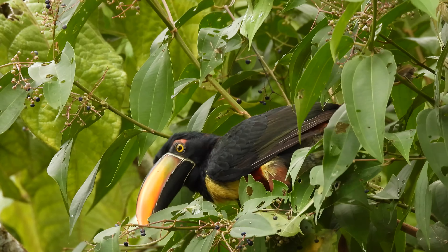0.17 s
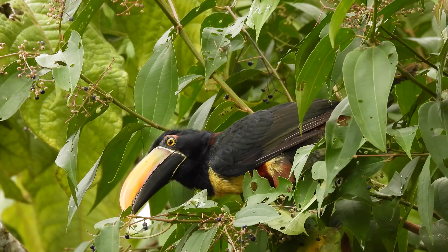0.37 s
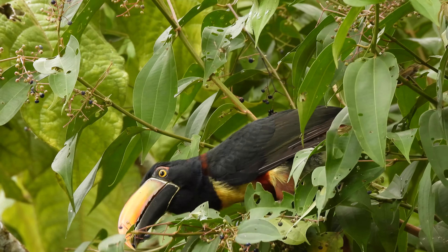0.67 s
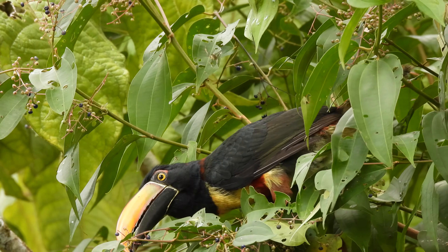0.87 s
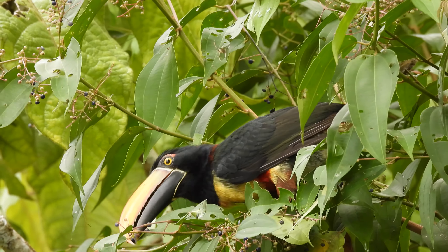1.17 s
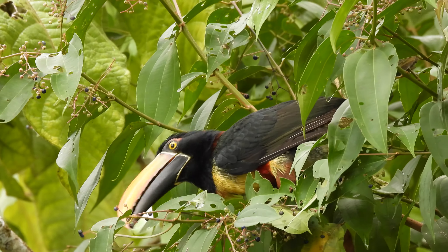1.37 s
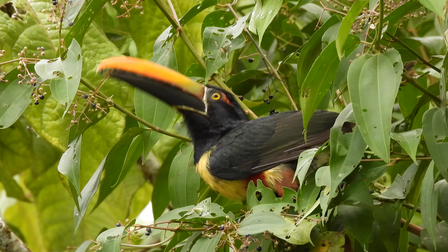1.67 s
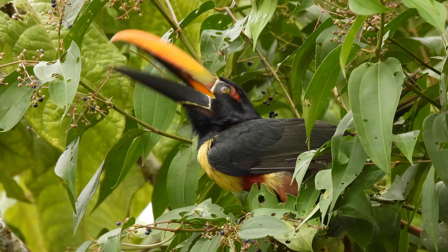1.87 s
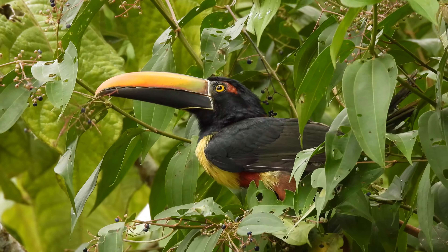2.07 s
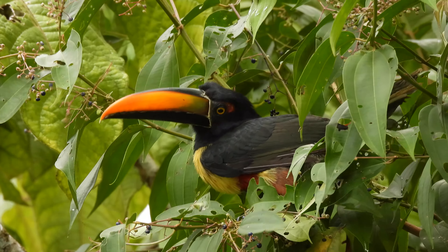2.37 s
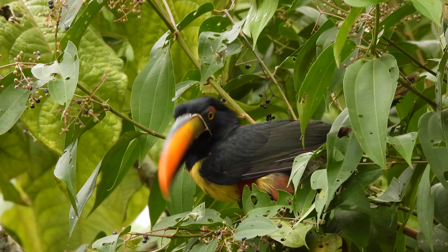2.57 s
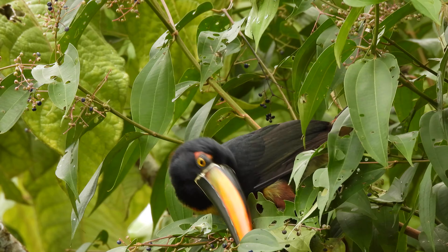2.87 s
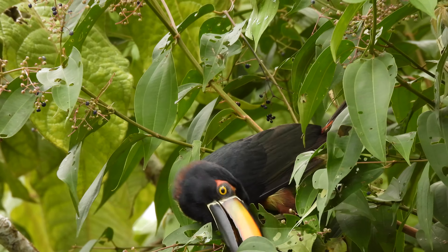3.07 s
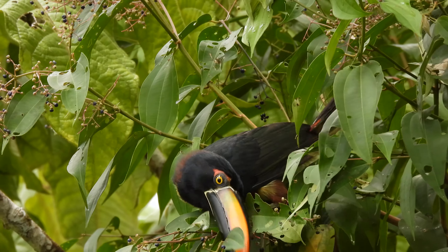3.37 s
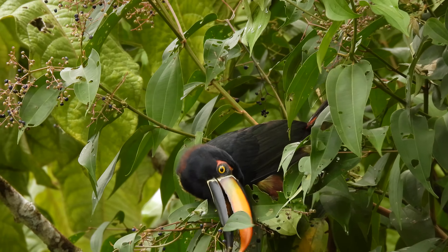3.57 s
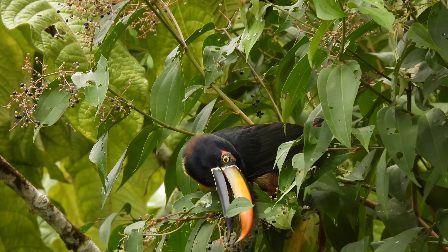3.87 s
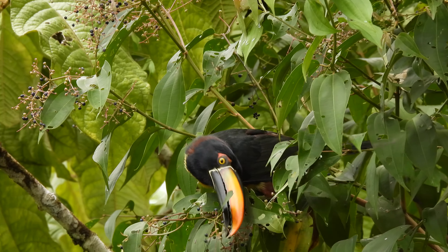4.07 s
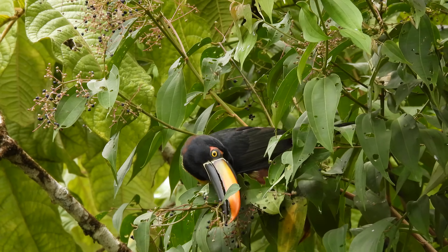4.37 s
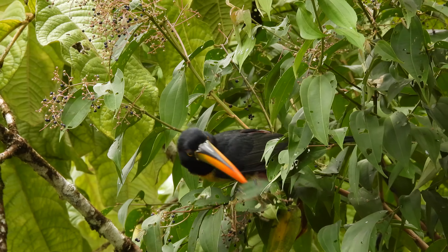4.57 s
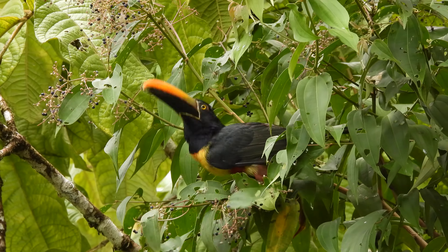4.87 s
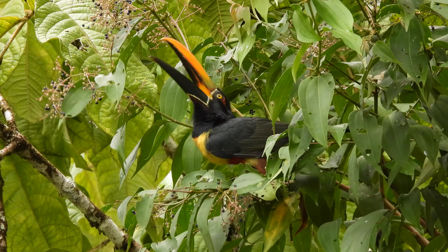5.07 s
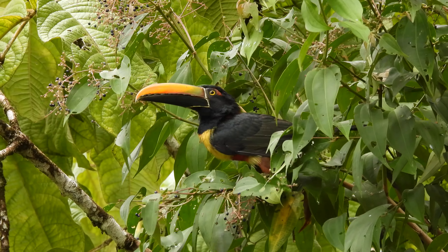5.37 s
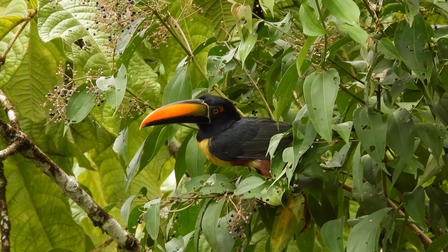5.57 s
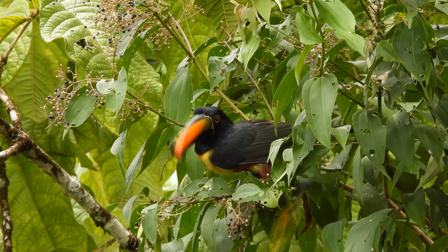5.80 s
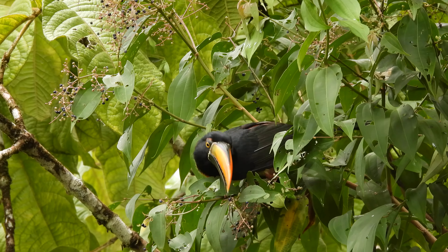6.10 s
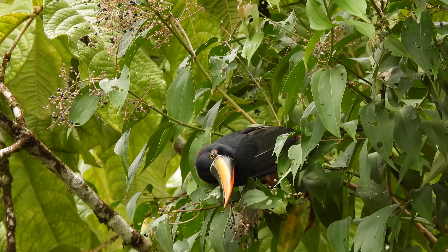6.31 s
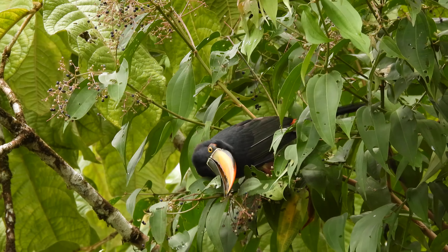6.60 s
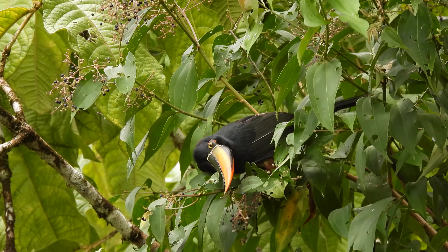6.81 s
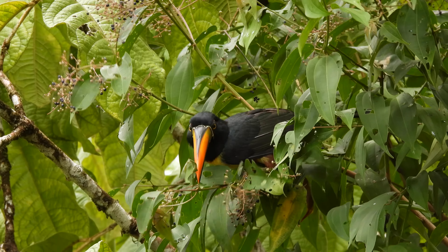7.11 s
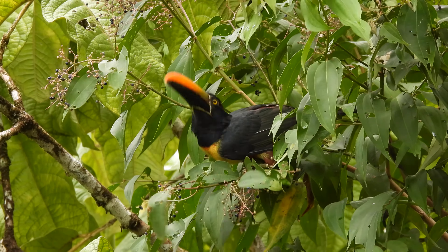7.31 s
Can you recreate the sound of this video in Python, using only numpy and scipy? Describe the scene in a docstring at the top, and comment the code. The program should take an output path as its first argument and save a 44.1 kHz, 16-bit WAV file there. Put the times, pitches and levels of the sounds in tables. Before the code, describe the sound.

Tropical forest insects sizzle steadily; one close cicada's rasping buzz fades, a small zoom motor whirs between clicks, and three rising chirps come near the end.

```python
"""Cicadas and crickets of a tropical forest

Insects sing all round a camera. A near cicada, two click trains shaped by a resonance curve, buzzes and winds
down over a noise chorus, a throbbing group and a narrow band that rises slightly in pitch until 3 s, then sinks.
Resonated noise strokes make whistles, crickets and a high katydid; three gliding tones chirp. Tapped resonances
make a zoom motor whir between clicks of its lever, while fingers knock, brush and creak on the body over rustle,
hiss and faint hum."""
import sys
import numpy as np
from scipy import signal
from scipy.fft import rfft, irfft, next_fast_len
from scipy.io import wavfile
from scipy.ndimage import uniform_filter1d

SR = 44100
rng = np.random.default_rng(int(sys.argv[2]) if len(sys.argv) > 2 else 0)


def digitize_waveform(pressure):
    """Quantize a signal to 16-bit integers and store it at the path in sys.argv[1].

    Rows of a 2-D input are taken as channels; values are limited to [-1, 1].
    """
    field = np.atleast_2d(pressure).T
    bounded = np.clip(field, -1, 1)
    quanta = np.round(bounded * 32767).astype(np.int16)
    wavfile.write(sys.argv[1], SR, quanta)


N = 328545

# Loudness of the near cicada: time_s, level_db
CICADA_LEVEL = [(0, -44), (.3, -41.5), (.55, -41), (1.3, -38), (1.8, -41), (2.3, -42.5), (2.8, -48),
                (3.8, -56.5), (5.5, -79), (7.45, -73)]
# Buckling pace of its tymbals: time_s, pace_hz, second_tymbal_lateness_cycles
CICADA_PACE = [(.9, 159.5, .0235), (1.0, 153, .0235), (1.1, 148.8, .0235), (1.25, 146.8, .0235),
               (1.4, 146, .0235), (1.7, 145.05, .0235), (2.03, 144.4, .023), (2.15, 143.4, .0135),
               (2.55, 142.95, .0135), (3.05, 140.9, .021), (3.6, 140.9, .021), (7.45, 135, .021)]
# Spectrum of its tymbal clicks: frequency_hz, relative_db
TYMBAL_SPECTRUM = [(3000, -24), (3250, -16.5), (3450, -8.5), (3630, -12.5), (3780, -1), (3950, -11),
                   (4250, -1), (5000, -2.5), (5480, -8.5), (6100, -1), (6450, -3), (7000, -2.5),
                   (7250, -8.5), (7600, -31)]
# Spectrum of the far chorus: frequency_hz, relative_db
CHORUS_SPECTRUM = [(2600, -30), (3100, -23), (3750, -13.5), (3930, -17.5), (4250, -4.5), (4480, -9.5),
                   (4770, -7), (5000, -5), (5240, -8.5), (5450, -5.5), (6000, -2), (6800, -7.5),
                   (7450, -21), (8300, -16), (8650, -11), (9000, -78), (9600, -24.5)]
# Loudness of the far chorus: time_s, level_db
CHORUS_LEVEL = [(0, -42.5), (.8, -45.5), (1.5, -42.5), (2.3, -41.5), (3, -41.5), (4.5, -44), (6, -44.5),
                (7.45, -45)]
# Loudness of the throbbing group at the top of a swell: time_s, level_db
THROB_LEVEL = [(0.2, -57), (.56, -40), (1.3, -43), (2.2, -47), (2.9, -43.5), (4.2, -40), (5.5, -45),
               (7.45, -52)]
# Spectrum of the throbbing group: frequency_hz, relative_db
THROB_SPECTRUM = [(5400, -23), (5600, -5), (5750, -1.5), (5870, 2), (6000, -12), (6350, -7.5), (6650, -14),
                  (7100, -27)]
# Narrow band of insects that rises slightly in pitch until 3 s, then sinks: time_s, centre_hz, level_db
DRIFTING_BAND = [(0, 4900, -60), (2, 5020, -56), (3, 5090, -54.5), (3.8, 5050, -52.5), (4.5, 4900, -53),
                 (5.3, 4770, -54), (6.2, 4730, -53), (7.45, 4650, -53)]
# Thin steady whistles in the chorus: start_s, length_s, wing_hz, level_db, stroke_rate_hz
WHISTLE_SONGS = [(.3, .7, 4786, -60, 5), (.4, 0.8, 5944, -48, 5), (0.65, 1.2, 7060, -68, 4.4),
                 (2.95, 1, 5060, -56, 5.7), (3, 1, 6347, -53, 5), (3.3, 2.6, 4780, -58, 4.3),
                 (4, 1.3, 4958, -63, 5), (3.8, 3.6, 5910, -54, 5)]
# Crickets that repeat one song: first_s, every_s, length_s, wing_hz, level_db, stroke_rate_hz
CRICKET_SINGERS = [(0, 9, 7.5, 8570, -65, 52), (2.48, 1.64, .75, 8520, -59, 44),
                   (-.1, 1.78, 1.0, 8320, -62.5, 34), (.25, 6.77, .92, 7900, -63, 60)]
# The katydid, likewise: first_s, every_s, length_s, wing_hz, level_db, stroke_rate_hz
KATYDID_SINGERS = [(.09, .396, .14, 12350, -78, 150)]
# Rising chirps: start_s, lowest_hz, peak_level_db
RISING_CHIRPS = [(6.845, 4710, -43.5), (7.065, 4200, -43), (7.38, 4160, -43)]
# Resonances of the lens barrel: centre_hz, width_hz, relative_db
BARREL_RESONANCES = [(1200, 500, -7), (2420, 520, 0), (8810, 120, -12), (9900, 1500, -13),
                     (13500, 4000, -21)]
# Contacts with the camera: start_s, peak_db, centre_hz, rattle_s, tick_relative_db
CONTACTS = [(3.08, -43, 1300, 0.005, -30), (3.081, -48.5, 630, 0.031, -30), (3.093, -40, 2450, 0.001, -25),
            (3.0995, -32.5, 2440, 0.00082, -13), (3.104, -48, 900, 0.003, -30),
            (3.133, -45, 2200, 0.003, -30), (3.1545, -35.5, 466, 0.001, -45),
            (3.155, -44, 1700, 0.002, -30), (3.161, -45, 297, 0.0017, -40), (4.334, -40, 1010, 0.004, -30),
            (4.3885, -34, 1150, 0.0023, 4.5), (4.3894, -33.5, 3030, 0.001, -5),
            (4.391, -37, 2100, 0.002, -25), (4.393, -43, 694, 0.0071, -35), (4.397, -37, 3180, 0.0033, -25),
            (4.4005, -34.5, 1150, 0.00073, -25), (4.402, -32.5, 1660, 0.002, -25),
            (4.596, -43, 2180, 0.0066, -40), (4.709, -46, 340, 0.0013, -32), (4.709, -41, 1230, 0.002, -25),
            (4.7105, -44, 2700, 0.0015, -19), (4.715, -38.5, 790, 0.0015, -32),
            (4.722, -38, 760, 0.0032, -35), (4.733, -47, 620, 0.0062, -35), (4.723, -48, 1850, 0.0024, -30),
            (4.794, -50, 950, 0.0036, -30), (5.21, -51, 980, 0.006, -30), (5.71, -51, 700, 0.007, -30),
            (5.944, -51, 1980, 0.002, -25), (5.945, -53, 2980, 0.002, -25),
            (6.762, -38.5, 1100, 0.0041, -35), (6.763, -48, 1600, 0.0027, -37),
            (6.875, -48, 920, 0.0073, -30), (6.957, -49.5, 880, 0.016, -30), (7.19, -49, 670, 0.0032, -30),
            (7.261, -52, 935, 0.0052, -30)]
# Modes of the camera body: frequency_hz, relative_db, t60_s
BODY_MODES = [(200, -2, .035), (260, -3, .03), (380, -2, .028), (500, 1, .028), (620, 0, .03),
              (780, 1, .025), (1100, 0, .022), (1300, 0, .018), (1600, 0, .014), (1850, -1, .012),
              (2380, 1, .016), (2650, -1, .014), (2950, 1, .016), (3200, 1, .025)]
# Cloth or skin brushing the body: start_s, length_s, centre_hz, width_hz, level_db
BRUSH_STROKES = [(0.0, 0.32, 1000, 1910, -58.5), (0.821, 0.15, 497, 500, -61),
                 (6.581, 0.02, 600, 900, -53.5), (6.712, 0.12, 1170, 940, -55.5),
                 (6.742, 0.061, 1480, 700, -51.5), (6.761, 0.039, 633, 150, -50)]
# Low creaks of the grip: start_s, length_s, pitch_hz, level_db
GRIP_CREAKS = [(6.21, 0.029, 381, -63), (6.34, 0.032, 402, -61.5), (6.385, 0.037, 400, -62),
               (6.432, 0.074, 393, -60), (6.635, 0.045, 568, -66), (7.387, .1, 565, -64.5)]
# Spectrum of distant leaves and water: frequency_hz, relative_db
RUSTLE_SPECTRUM = [(53, -73), (90, -25.5), (154, -18.5), (177, -6.5), (282, -5), (319, -2.5), (408, -6),
                   (690, -1.5), (857, -3.5), (969, -4), (1060, -4), (1600, -6.5), (2340, -8), (2900, -9.5),
                   (3600, -8.5), (4680, -40)]
# Loudness of the rustle: time_s, level_db
RUSTLE_LEVEL = [(0, -59), (1, -58.5), (2.5, -59), (4, -58.5), (5.5, -60), (7.45, -58)]
# Spectrum of the thin treble: frequency_hz, relative_db
HISS_SPECTRUM = [(7200, -9), (8600, -10), (9050, -9), (10200, -17), (11200, -23), (12300, -21),
                 (13200, -39), (14300, -19.5), (15900, -17)]
# Loudness of the thin treble: time_s, level_db
HISS_LEVEL = [(0, -70), (1.5, -65.5), (4.3, -66), (5, -73), (7.45, -71.5)]
# Faint hum: time_s, pitch_hz, level_db
HUM_TONE = [(0, 186, -86), (3.3, 188.8, -76.5), (4.5, 188.9, -78.5), (7.45, 188.4, -100)]

BODY_LAG_S = 2.5e-5  # the lens side of the body is nearer the right port


def undb(db):
    """Definition of the decibel: amplitude ratio from level."""
    return 10 ** (np.asarray(db) / 20)


def unit(x):
    """Equal mean power: scales to rms 1."""
    return x / np.sqrt(np.mean(x ** 2))


def curves(table):
    """Linear interpolation: columns of a table joined by straight lines in time."""
    s, *columns = np.transpose(table)
    return [np.interp(np.arange(N) / SR, s, column) for column in columns]


def colour(x, table):
    """Spectral filtering: shapes x by frequency and level points, then sets rms 1."""
    hz, db = np.transpose(table)
    size = next_fast_len(N, True)
    f = np.fft.rfftfreq(size, 1 / SR) + 1e-3  # keeps the logarithm finite
    gain = undb(np.interp(np.log(f), np.log(hz), db, -120, -120))
    return unit(irfft(rfft(x, size) * gain, size)[..., :N])


def ring(x, hz, width_hz):
    """Second-order resonance with gain 1 at the centre."""
    return signal.lfilter(*signal.iirpeak(hz, hz / width_hz, SR), x)


def walk(rate, size=N):
    """Smoothed random modulation: levels held 1 / rate s and averaged twice; spread 1."""
    k = int(SR / rate)
    held = np.repeat(rng.standard_normal(size // k + 3), k)
    return unit(uniform_filter1d(uniform_filter1d(held, k), k))[:size]


def gate(start, end, edge):
    """Amplitude window: 1 from start to end with soft edges."""
    t = np.arange(N) / SR
    return np.clip(np.minimum(t - start, end - t) / edge + .5, 0, 1)


def diffuse(count):
    """Diffuse-field coherence: ports hear alike bass, unlike sound once their gap nears half a wave."""
    gap_m, likeness, sound_speed = .028, .61, 343  # speed in m/s
    size = next_fast_len(count, True)
    like = likeness * np.sinc(2 * np.fft.rfftfreq(size, 1 / SR) * gap_m / sound_speed)
    mid, side = rfft(rng.standard_normal((2, size))) * np.sqrt([1 + like, 1 - like])
    return irfft(np.array([mid + side, mid - side]), size)[:, :count] / np.sqrt(2)


def ports(x, lag_s, pan_db=0.):
    """Arrival-time difference: a sound from one side reaches the left port lag_s later."""
    size = next_fast_len(N, True)
    turn = np.exp(-2j * np.pi * np.fft.rfftfreq(size, 1 / SR) * lag_s)
    left = irfft(rfft(x, size) * turn, size)[:N]
    return np.array([left * undb(pan_db / 2), x * undb(-pan_db / 2)])


def forest(x, t60, wet_db, lag_s, pan_db):
    """Reverberant scattering: direct sound plus decaying echoes of trunks and leaves; power is kept."""
    t = np.arange(int(SR / 2)) / SR
    tail = diffuse(len(t)) * 1000. ** (-t / t60)
    tail = tail / np.sqrt(np.sum(tail ** 2) / 2)
    wet = signal.fftconvolve(x[None], tail, axes=1)[:, :N]
    return (ports(x, lag_s, pan_db) + undb(wet_db) * wet) / np.sqrt(1 + undb(2 * wet_db))


def pace():
    """Entrainment: the tymbals race until they lock, settle, then slowly loosen in timing."""
    lock_s, settle_s = .9, .04
    tight, loose, loosen_per_s2 = .0004, .015, .0004  # parts of the timing scatter, in cycles
    since = np.clip(np.arange(N) / SR - lock_s, 0, None)
    scatter = tight + loose * np.exp(-since / settle_s) + loosen_per_s2 * since ** 2
    hz, late = curves(CICADA_PACE)
    return hz, late, scatter


def cicada():
    """Periodic impulses: two tymbals buckle in turn; steady timing gives a line comb, loose timing a rasp."""
    weak_side_db, click_scatter_db = -6, .8
    hz, late, scatter = pace()
    half_cycles = np.cumsum(2 * hz / SR)
    count = np.arange(1, int(half_cycles[-1]))
    second = count % 2  # 1 for the second, softer tymbal
    at = np.interp(count, half_cycles, np.arange(N))
    chance = rng.standard_normal((len(count), 2))
    now = at.astype(int)
    at = at + (scatter[now] * chance[:, 0] + late[now] * second) * SR / hz[now]
    size = undb(weak_side_db * second + click_scatter_db * chance[:, 1])
    # windowed sinc places each click between samples
    taps = np.arange(-8, 9)
    spots = np.round(at)[:, None] + taps
    clicks = size[:, None] * np.sinc(spots - at[:, None]) * np.hanning(len(taps) + 2)[1:-1]
    pulses = np.bincount(np.clip(spots, 0, N - 1).astype(int).ravel(), clicks.ravel(), N)
    song = colour(pulses, TYMBAL_SPECTRUM) * undb(curves(CICADA_LEVEL)[0])
    return forest(song, t60=.9, wet_db=2.5, lag_s=8e-5, pan_db=-1.3)


def chorus():
    """Incoherent superposition: countless far cicadas merge into a noise band combed by fixed echoes."""
    echo_share = 1.1
    echoed = forest(rng.standard_normal(N), t60=.35, wet_db=2.9, lag_s=8e-5, pan_db=-.32)
    return colour(diffuse(N) + echo_share * echoed, CHORUS_SPECTRUM) * undb(curves(CHORUS_LEVEL)[0])


def throbbing_group():
    """Amplitude modulation: a nearer group's noise band swells three times a second."""
    peak_s, every_s, sharpness = .56, .333, 1.7
    t = np.arange(N) / SR
    swell = np.abs(np.cos(np.pi * (t - peak_s) / every_s)) ** sharpness
    song = colour(rng.standard_normal(N), THROB_SPECTRUM) * undb(curves(THROB_LEVEL)[0]) * swell
    return forest(song, t60=.22, wet_db=-4., lag_s=9e-5, pan_db=-.27)


def drifting_group():
    """Quadrature modulation: slow noise on a drifting carrier is a narrow band of many alike wings."""
    width_hz = 250
    hz, db = curves(DRIFTING_BAND)
    lowpass = signal.butter(2, width_hz / 2, fs=SR, output="sos")
    slow = signal.sosfilt(lowpass, rng.standard_normal((2, 2, N)))
    phase = 2 * np.pi * np.cumsum(hz) / SR
    return undb(db) * unit(slow[0] * np.cos(phase) + slow[1] * np.sin(phase))


def wings(song_rows, width_hz, depth, edge):
    """Stridulation: a file drawn over a scraper, stroke after uneven stroke, rings the narrow wing."""
    out = np.zeros(N)
    for start, length, hz, db, rate in song_rows:
        end = start + length
        span = slice(max(int((start - edge) * SR), 0), min(int((end + edge) * SR), N))
        size = span.stop - span.start
        uneven_rate = rate * (1 + .25 * walk(4.6, size))
        stroke = np.sin(np.pi * np.cumsum(uneven_rate) / SR) ** 2
        scrape = rng.standard_normal(size) * (1 - depth * stroke) * undb(.46 * walk(8.1, size))
        tone = unit(ring(ring(scrape, hz, width_hz), hz, width_hz))
        out[span] += undb(db) * gate(start, end, edge)[span] * tone
    return out


def songs(singers, stop_s):
    """Periodic repetition: one song row for every repeat before stop_s."""
    return [(s, *song) for first, every, *song in singers for s in np.arange(first, stop_s, every)]


def whistles():
    """Sharp resonance: very narrow wings turn shallow strokes into thin whistles."""
    song = wings(WHISTLE_SONGS, width_hz=22., depth=.26, edge=.083)
    return forest(song, t60=.62, wet_db=2., lag_s=8e-5, pan_db=-.5)


def crickets():
    """Resonant stridulation: deep, fast strokes make each cricket trill."""
    song = wings(songs(CRICKET_SINGERS, N / SR - .1), width_hz=140., depth=.96, edge=.04)
    return forest(song, t60=.3, wet_db=4., lag_s=6e-5, pan_db=-4.)


def katydid():
    """Broad resonance: a heavily damped wing gives a high, noisy song, with no repeat begun after 1.9 s."""
    song = wings(songs(KATYDID_SINGERS, 1.9), width_hz=600., depth=.6, edge=.048)
    return forest(song, t60=.17, wet_db=3., lag_s=8e-5, pan_db=-1.5)


def chirps():
    """Frequency modulation: a hoarse whistle glides upward, blurred by echoes."""
    length_s, top_hz, hoarse_hz = .11, 5200, 230
    out, t = 0, np.arange(N) / SR
    for start, low_hz, db in RISING_CHIRPS:
        part = np.clip((t - start) / length_s, 0, 1)
        glide_hz = low_hz + (top_hz - low_hz) * np.sin(np.pi / 2 * part)
        hz = glide_hz + hoarse_hz * walk(220)
        swell = np.sin(np.pi * part) * (part < 1)
        out = out + undb(db) * swell * np.sin(2 * np.pi * np.cumsum(hz) / SR)
    return forest(np.sqrt(2) * out, t60=.5, wet_db=1.5, lag_s=3e-5, pan_db=-.5)


def zoom():
    """Forced resonance: gear teeth tap evenly and puff noise into the modes of the lens barrel."""
    start_s, end_s, level_db = 3.11, 4.71, -58.5
    teeth_hz, waver_hz = 143.8, .9
    wobble_hz, wobble_s, fastest_s = .9, .46, 3.28  # the pace swings once a turn of the big gear
    roughness = .9  # noise beside each clean tap
    t = np.arange(N) / SR
    wobble = wobble_hz * np.cos(2 * np.pi * (t - fastest_s) / wobble_s)
    turns = np.cumsum(teeth_hz + waver_hz * walk(30) + wobble) / SR
    taps = np.diff(np.floor(turns), prepend=0) * undb(2.6 * walk(60))
    puffs = rng.standard_normal(N) * (1.3 + np.exp(-(turns % 1) / .38))
    teeth = unit(taps) + roughness * unit(puffs)
    whir = 0
    for hz, width_hz, db in BARREL_RESONANCES:
        whir = whir + undb(db) * unit(ring(ring(teeth, hz, width_hz), hz, width_hz))
    return ports(undb(level_db) * gate(start_s, end_s, .0032) * whir, BODY_LAG_S, -.32)


def knocks():
    """Modal excitation: a short contact rattle rings modes near its colour; hard contacts add a bright tick."""
    tick_hz, tick_width_hz = 8300, 4000
    out, t = np.zeros(N + SR), np.arange(SR // 8) / SR
    for s, peak_db, hz, rattle_s, tick_db in CONTACTS:
        age = t / rattle_s
        push = rng.standard_normal(len(t)) * np.sqrt(age) * np.exp(-age)
        width_hz = 1.1 * hz
        push = ring(ring(push, hz, width_hz), hz, width_hz)
        body = 0
        for mode_hz, mode_db, t60 in BODY_MODES:
            near_db = mode_db - 70 * np.log2(mode_hz / hz) ** 2  # favours modes near the contact's colour
            mode = unit(ring(push, mode_hz, np.log(1000) / np.pi / t60))
            body = body + undb(near_db) * mode * np.sqrt(t60)
        tick = ring(rng.standard_normal(len(t)) * np.exp(-t / .0018), tick_hz, tick_width_hz)
        hit = body / np.abs(body).max() + undb(tick_db) * tick / np.abs(tick).max()
        out[int(s * SR):int(s * SR) + len(t)] += undb(peak_db) * hit
    return ports(out[:N], BODY_LAG_S, -.6)


def brushes():
    """Sliding friction: soft, grainy noise with no clear attack."""
    out = 0
    for start, length, hz, width_hz, db in BRUSH_STROKES:
        rub = rng.standard_normal(N) * undb(1.2 * walk(35.14))
        rub = unit(ring(ring(rub, hz, width_hz), hz, width_hz))
        out = out + undb(db) * gate(start, start + length, .022) * rub
    return ports(out, 4e-5)


def creaks():
    """Stick-slip: plastic slips under the grip and hums unevenly."""
    out = 0
    for start, length, hz, db in GRIP_CREAKS:
        tone = np.sin(2 * np.pi * np.cumsum(hz * (1 + .03 * walk(90))) / SR)
        out = out + undb(db + 2.9 * walk(50)) * gate(start, start + length, .0072) * tone
    return ports(np.sqrt(2) * out, 4e-5)


def rustle():
    """Diffuse noise: distant leaves and water flicker in level."""
    return colour(diffuse(N), RUSTLE_SPECTRUM) * undb(curves(RUSTLE_LEVEL)[0] + 1.2 * walk(7.3))


def hiss():
    """Diffuse noise: a thin treble flickers in level."""
    return colour(diffuse(N), HISS_SPECTRUM) * undb(curves(HISS_LEVEL)[0] + 2.8 * walk(12.))


def hum():
    """Sinusoidal oscillation: one faint tone drifts in pitch and level."""
    hz, db = curves(HUM_TONE)
    return np.sqrt(2) * undb(db) * np.sin(2 * np.pi * np.cumsum(hz) / SR)


def scene():
    """Linear superposition of all sources at the two ports."""
    insects = cicada() + chorus() + throbbing_group() + drifting_group()
    insects = insects + whistles() + crickets() + katydid() + chirps()
    handling = zoom() + knocks() + brushes() + creaks()
    return insects + handling + rustle() + hiss() + hum()


def record(dry):
    """Band limiting: the camera cuts the bass steeply, adds a trace of noise and cuts the very top."""
    left_db, noise_db, bass_cut_hz, top_hz = -.2, -100, 150, 15720
    highpass = signal.butter(3, bass_cut_hz, "high", fs=SR, output="sos")
    wired = signal.sosfilt(highpass, dry * undb([[left_db], [0]]))
    wired = wired + undb(noise_db) * rng.standard_normal(dry.shape)
    return signal.sosfilt(signal.ellip(10, .2, 70, top_hz, fs=SR, output="sos"), wired)


dry = scene()
out = record(dry)
digitize_waveform(out)
```